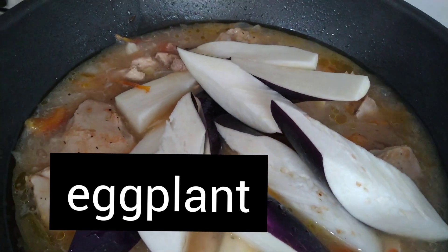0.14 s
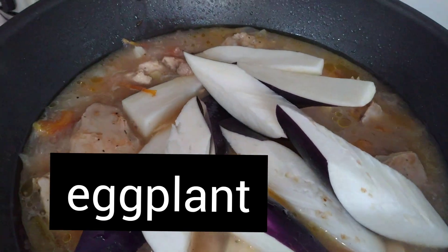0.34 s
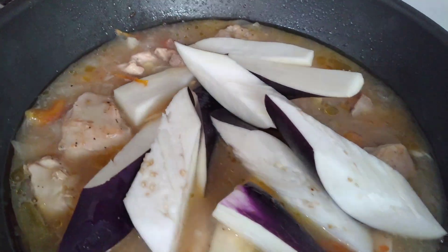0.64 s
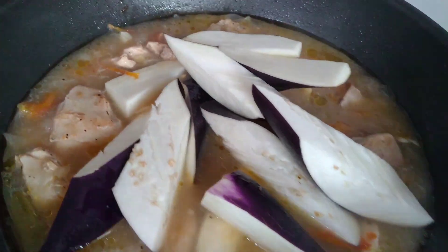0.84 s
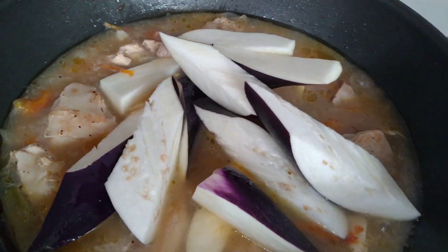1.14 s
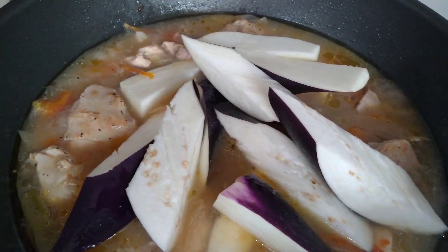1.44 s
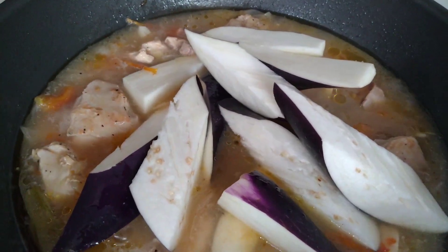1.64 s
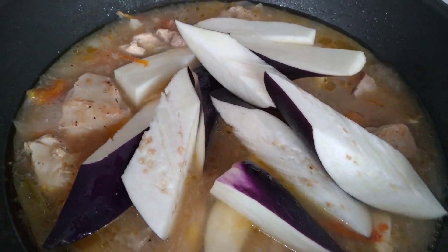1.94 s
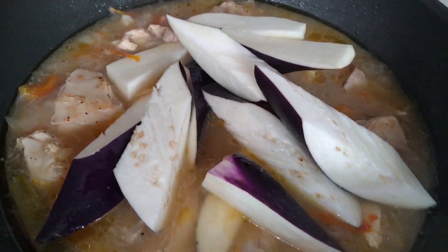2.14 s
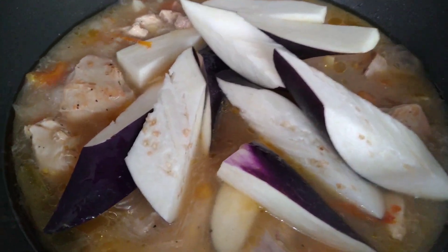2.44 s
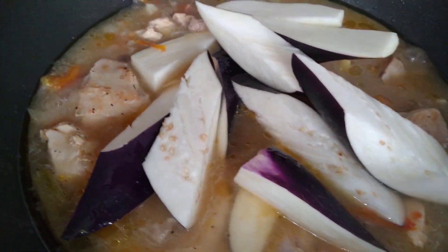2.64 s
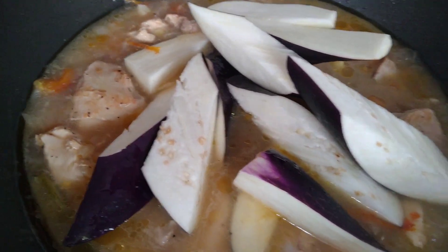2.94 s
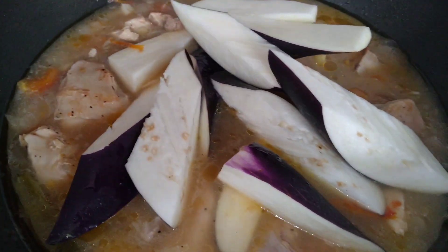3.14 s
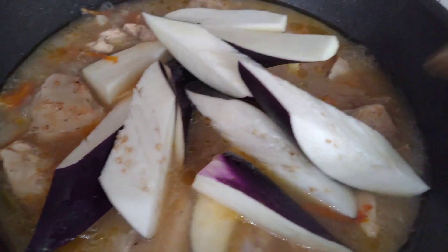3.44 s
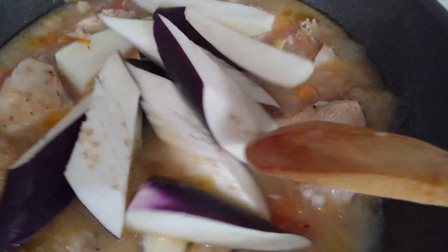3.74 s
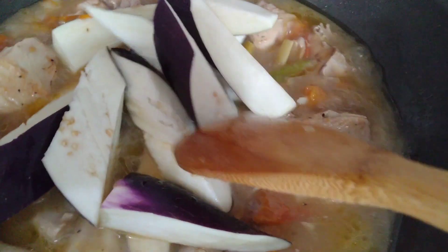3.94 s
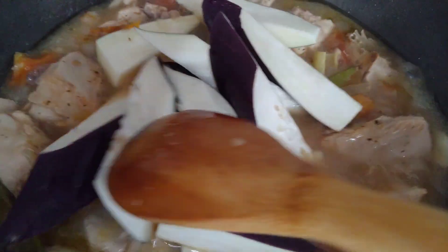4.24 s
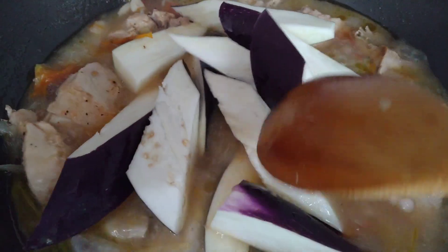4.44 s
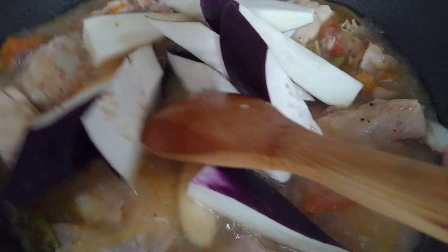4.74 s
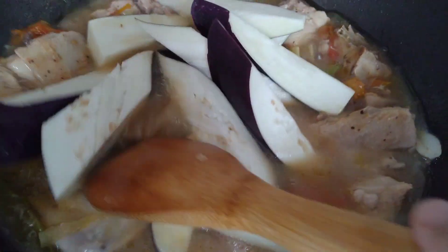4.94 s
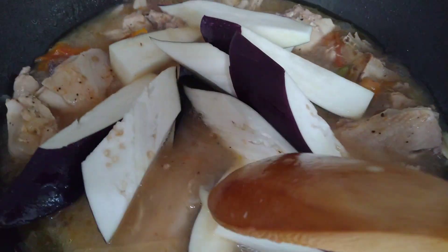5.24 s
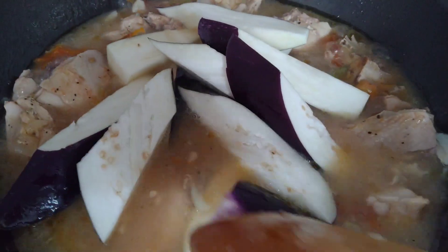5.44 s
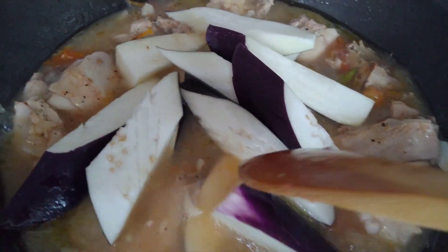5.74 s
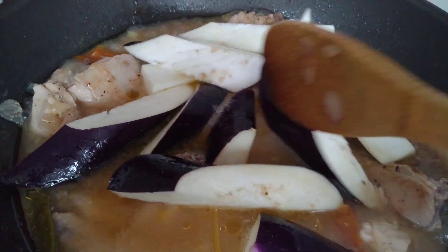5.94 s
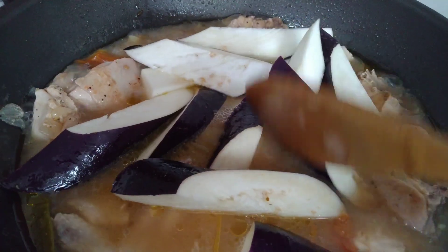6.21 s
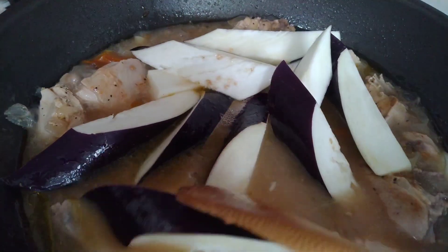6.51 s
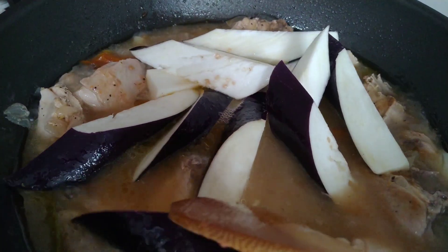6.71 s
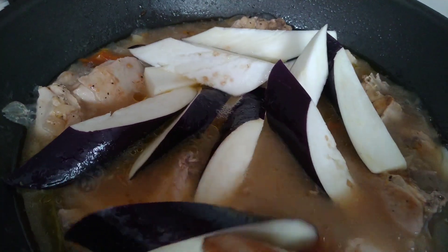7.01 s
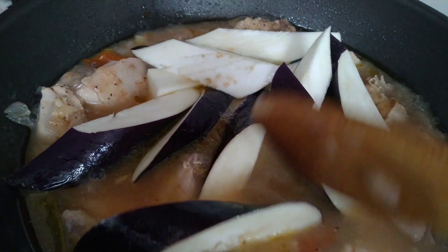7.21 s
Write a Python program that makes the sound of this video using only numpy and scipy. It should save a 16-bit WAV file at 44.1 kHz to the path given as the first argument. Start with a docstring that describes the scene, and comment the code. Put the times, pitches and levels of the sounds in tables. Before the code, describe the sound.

A simmering pan plops and seethes, a dish clacks nearby, and vegetables are pushed through sloshing broth while the stove hums.

```python
"""Soup simmers in a pan, heard from just above: bubbles burst over a fine seething, the pan rings faintly.
The stove hums and throbs as close tones beat. In the small kitchen a dish clacks down, wood knocks and a
utensil clinks, each ringing in its modes. Then a wooden spatula pushes vegetable slices through the broth,
which sloshes, squelches and spits on the hot wall; it scrapes the pan once. The sound drops out briefly."""
import sys
import numpy as np
from scipy import signal
from scipy.fft import rfft, irfft
from scipy.io import wavfile

SR = 44100
rng = np.random.default_rng(int(sys.argv[2]) if len(sys.argv) > 2 else 0)


def materialize(psi):
    """Save the field psi as 16-bit PCM at rate SR to the path in sys.argv[1].

    A 1-D psi becomes a single channel; in a 2-D psi each row is a channel.
    """
    bounded = np.clip(np.atleast_2d(psi).T, -1, 1)
    quanta = np.round(bounded * 32767).astype(np.int16)
    wavfile.write(sys.argv[1], SR, quanta)


N = 325017
TIME = np.arange(N) / SR

# spectrum of splashing broth: f/Hz, level/dB
SQUELCH_COLOUR = [(150, -4.5), (450, -6.5), (850, -4.5), (1700, 5), (3200, -3), (4300, -12.5),
                  (8000, -17.5), (12000, -23)]
# spectrum of droplets on hot metal: f/Hz, level/dB
SPIT_COLOUR = [(1000, -29), (3000, -2), (5000, -19), (8000, 0), (11000, -8.5), (14500, 4.5), (16000, -6)]


def amp(db):
    return 10 ** (np.asarray(db) / 20)


def unit(x):
    return x / np.sqrt(np.mean(x ** 2) + 1e-20)


def at_hz(points, hz):
    """Table value, interpolated over log frequency."""
    f, value = np.transpose(points)
    return np.interp(np.log(hz + 1), np.log(f + 1), value)


def follow(points):
    """Table value, interpolated over time."""
    return np.interp(TIME, *np.transpose(points))


def add(mix, start_s, sound):
    part = mix[max(round(start_s * SR), 0):][:len(sound)]
    part += sound[:len(part)]


def swell(peak_s, rise_s, fall_s):
    """Gaussian rise to 1, exponential fall."""
    t = TIME - peak_s
    return np.exp(-(np.minimum(t, 0) / rise_s) ** 2 - np.maximum(t, 0) / fall_s)


def stirred(start_s=3.5, ramp_s=0.094):
    """0 before stirring, ramping to 1."""
    return np.clip((TIME - start_s) / ramp_s, 0, 1)


def click(colour, size=4096):
    """Minimum-phase click of unit energy with the given spectrum."""
    hz = abs(np.fft.fftfreq(size, 1 / SR))
    log_gain = np.log(amp(np.maximum(at_hz(colour, hz), -90)))
    spectrum = np.exp(np.conj(signal.hilbert(log_gain)))
    pulse = np.fft.ifft(spectrum).real[:size // 2]
    return pulse / np.linalg.norm(pulse)


def coloured(x, colour):
    return signal.oaconvolve(x, click(colour))[:N]


def narrow_noise(hz, width_hz):
    """Noise in one resonance; at 0 Hz, a random drift."""
    f = np.fft.rfftfreq(N, 1 / SR)
    return unit(irfft(rfft(rng.standard_normal(N)) / (1 + ((f - hz) / width_hz) ** 2), N))


def impulses(per_s, spread_db):
    """Randomly timed impulses of random size and sign."""
    size = amp(spread_db * np.minimum(rng.exponential(1, N), 4)) * rng.choice([-1, 1], N)
    return size * (rng.random(N) < per_s / SR)


def room(x, size=30000):
    """Kitchen reverberation: dense reflections, each band decaying at its own rate."""
    # reverberation time: f/Hz, t60/s
    decay = [(150, 0.79), (500, 0.54), (1200, 0.42), (3000, 0.44), (7000, 0.35), (15000, 0.51)]
    reflections = rng.choice([-1., 1.], size) * (rng.random(size) < 0.2)
    hz, t, bands = signal.stft(reflections, SR, nperseg=256)
    bands = bands * amp(-60 * t / at_hz(decay, hz)[:, None])
    tail = signal.istft(bands, SR, nperseg=256)[1]
    tail *= 1 - np.exp(-np.arange(len(tail)) / SR / 0.00067)
    return signal.fftconvolve(x, tail / np.linalg.norm(tail))[:len(x)]


def bubble(hz, cycles, size=1500):
    """A burst bubble's cavity: swells within a cycle, rings down, rises slightly in pitch."""
    turns = hz * np.arange(size) / SR
    envelope = (1 - np.exp(-(turns / 0.5) ** 2)) * np.exp(-turns / cycles)
    wave = envelope * np.sin(2 * np.pi * (turns + 0.053 * turns ** 2 / (turns + 3)))
    return wave / abs(wave).max()


def fizz(low_hz, high_hz, per_s, spread_db, cycles):
    """Bubble swarm, random in time, pitch and size."""
    out = np.zeros(N)
    for when, pitch, rarity in rng.random((int(per_s * N / SR), 3)):
        hz = low_hz * (high_hz / low_hz) ** pitch
        size_db = spread_db * min(-np.log(1 - rarity), 3)
        add(out, when * N / SR, amp(size_db) * unit(bubble(hz, cycles)))
    return unit(out)


def plopping(splash_db=-26, splash_decay_s=0.013):
    """Large bubbles burst and their film splashes back; lesser plops fall between."""
    # large bubbles: t/s, peak/dB, f/Hz, decay/cycles
    bursts = [(0.195, -35, 1170, 2.4), (0.314, -44.5, 930, 1.2), (0.411, -44, 820, 1.3),
              (0.621, -34.5, 1130, 1.2), (0.699, -34.5, 1380, 1.1), (0.731, -44, 1000, 2),
              (0.79, -42, 1390, 2.5), (0.906, -41.5, 1250, 5), (0.973, -43, 940, 1.8),
              (0.985, -43, 1140, 1.4), (1.133, -40, 800, 1.8), (1.272, -40, 920, 1.1),
              (1.284, -32, 1000, 1.5), (1.389, -35.5, 865, 2.8), (1.611, -36.5, 1170, 1.4),
              (2.549, -32, 690, 0.78), (2.713, -36, 890, 0.43), (3.167, -34, 1270, 2.4),
              (3.268, -41.5, 784, 1.2), (3.321, -38, 1200, 3.9), (3.405, -38.5, 1250, 1.6),
              (3.542, -30.5, 1300, 3.5), (3.847, -43, 3100, 1.5), (4.265, -38, 690, 0.47),
              (4.496, -40, 1520, 2.9), (4.709, -43, 1690, 2), (4.728, -38.5, 1380, 1.7),
              (4.769, -40.5, 630, 1.1), (4.772, -38, 1670, 1.1), (5.101, -42, 3250, 4),
              (5.317, -41, 1400, 2.5), (5.34, -43, 1720, 3.3), (5.548, -38.5, 1380, 3.6),
              (5.629, -38, 1180, 1.8), (5.721, -41.5, 2250, 2.3), (5.899, -41.5, 1760, 2.2),
              (6.211, -39.5, 1760, 8.4), (6.313, -34, 1370, 3.1)]
    plops, splash_envelope = np.zeros(N), np.zeros(N)
    fall = np.exp(-TIME[:3000] / splash_decay_s)
    for start_s, db, hz, cycles in bursts:
        add(plops, start_s, amp(db) * bubble(hz, cycles))
        add(splash_envelope, start_s, amp(db + splash_db) * fall)
    splashes = splash_envelope * coloured(rng.standard_normal(N), SQUELCH_COLOUR)
    lesser = amp(-74) * fizz(650, 1180, per_s=4, spread_db=0, cycles=1.3)
    return plops + splashes + lesser


def seething():
    """A bed of small bubbles and fine crackle; the pan rings faintly along."""
    # crackle spectrum: f/Hz, level/dB
    seethe_colour = [(60, -42), (300, -2.5), (600, 0.5), (1200, -3), (2000, -5), (3400, -8.5),
                     (4100, -16.5), (6800, -18.5), (7650, -13), (7950, -14), (8200, -12), (9500, -20.5),
                     (12000, -22), (15000, -17)]
    # seething strength: t/s, gain/dB
    heat = [(0, -2), (1.7, -1), (2.6, 0), (4.5, 0.5), (5.7, 0.5), (7.37, -2)]
    # pan resonances: f/Hz, level/dB
    pan_modes = [(339, -70.5), (1346, -86), (1855, -76), (2164, -80.5), (2767, -81)]
    bubbles = amp(-67.5) * fizz(503, 2040, per_s=80, spread_db=3.2, cycles=3.6)
    crackle = amp(-61.5) * unit(coloured(impulses(per_s=7000, spread_db=2), seethe_colour))
    pan = sum(amp(db) * narrow_noise(hz, width_hz=7.8) for hz, db in pan_modes)
    return amp(follow(heat)) * (bubbles + crackle) + pan


def stove(hum_hz=104.42, throb_hz=1.74, flutter_hz=6.93, throb_crest_s=3.415, flutter_crest_s=3.46):
    """A hum beats with two weaker tones just below it, over a low rush; hum and throb swell once."""
    # rush spectrum: f/Hz, level/dB
    rush_colour = [(30, -46.5), (55, -21), (80, -9), (110, 4), (135, 1), (185, -3), (250, -10), (310, -6),
                   (450, -14), (800, -18.5), (2000, -51.5)]
    middle_s, spread_s = 3.5, 1.7
    surge = np.exp(-abs((TIME - middle_s) / spread_s) ** 3)
    turns = hum_hz * TIME + 0.011 * narrow_noise(0, width_hz=2.8)
    roughness = 0.069 * narrow_noise(hum_hz, width_hz=11)
    hum = amp(-52 + 1.2 * surge) * (np.sin(2 * np.pi * turns) + roughness)
    throb = amp(-54.5) * surge * np.sin(2 * np.pi * (turns - throb_hz * (TIME - throb_crest_s)))
    flutter = amp(-65.5) * np.sin(2 * np.pi * (turns - flutter_hz * (TIME - flutter_crest_s)))
    rush = amp(-55) * unit(coloured(rng.standard_normal(N), rush_colour))
    return np.sqrt(2) * (hum + throb + flutter) + rush


def strikes(blows, colour, modes, ring_db, crack_db, echo_s, echo_gain, size=33000):
    """Each blow: a thud with counter echo and reverberation, a bright crack, the object's modes."""
    # contact spectrum: f/Hz, level/dB
    crack_colour = [(500, -16.5), (3000, -3), (5000, -15), (8500, -2), (11500, -16), (16000, -16)]
    crack_decay_s = 0.0093
    t, thud, out = np.arange(size) / SR, np.zeros(size), np.zeros(N)
    ring = sum(amp(db - 60 * t / t60_s) * np.sin(2 * np.pi * (hz * t + rng.random()))
               for hz, db, t60_s in modes)
    ring *= amp(ring_db) / np.linalg.norm(ring)
    add(thud, 0, click(colour))
    add(thud, echo_s, echo_gain * click(colour))
    thud /= np.linalg.norm(thud)
    for start_s, db, room_db in blows:
        crack = coloured(rng.standard_normal(size), crack_colour)[:size] * np.exp(-t / crack_decay_s)
        crack *= amp(crack_db) / np.linalg.norm(crack)
        add(out, start_s, amp(db) * (thud + crack + ring + amp(room_db) * room(thud)))
    return out


def dish_clack():
    """A dish lands on its foot and rocks back once."""
    # contacts: t/s, level/dB, room gain/dB
    blows = [(1.7654, 1, 8.5), (1.767, -3.5, 9), (1.8195, -1.5, 4.5)]
    # impact spectrum: f/Hz, level/dB
    colour = [(120, -64), (250, -24), (400, -10.5), (600, -6), (1040, 2), (1550, -4), (2000, -1), (2300, 2),
              (2700, -10), (4000, -15), (5400, -26.5), (8100, -17), (9000, -32.5), (15500, -43)]
    # dish modes: f/Hz, level/dB, t60/s
    modes = [(377.4, -6, 0.29), (767, -10.5, 0.35), (975, 2.5, 0.49), (965, -16.5, 0.98),
             (1073, -4.5, 0.27), (1153, -12.5, .3), (1253, -16, 0.18), (1520, -29, 0.18), (2103, -6, 0.22),
             (2220, -2.5, .33), (2225, -11, .48), (2265, 0, 0.33), (2380, -23, 0.67), (7100, -27, .2),
             (8050, -11, 0.39)]
    return strikes(blows, colour, modes, ring_db=2, crack_db=-18, echo_s=0.001347, echo_gain=0.23)


def wood_knock():
    """One duller blow on wood."""
    # contact: t/s, level/dB, room gain/dB
    blows = [(2.077, -3.5, 6)]
    # impact spectrum: f/Hz, level/dB
    colour = [(50, -62), (150, -8), (280, -11), (400, 0.5), (550, -2.5), (675, 0.5), (1060, 4),
              (1650, -12.5), (3000, -12), (4000, -28), (8000, -29.5), (16000, -43)]
    # wood modes: f/Hz, level/dB, t60/s
    modes = [(430, -8, 0.55), (665, 4, 0.34), (715, -5.5, .25), (790, -1, 0.47), (936, -13, 0.57),
             (1030, -9, 0.29), (1220, -8, 0.18), (3210, -6, 0.16), (3100, -2.5, 0.12)]
    return strikes(blows, colour, modes, ring_db=4, crack_db=-9, echo_s=0.00142, echo_gain=0.17)


def utensil_clinks():
    """Light taps excite a utensil's high, short-lived modes."""
    # contacts: t/s, level/dB, room gain/dB
    blows = [(2.5315, -28, 8.5), (2.572, -35, -6), (2.624, -24.5, 3)]
    # impact spectrum: f/Hz, level/dB
    colour = [(300, -39), (800, 13), (2800, 9), (4200, -0.5), (6500, 1.5), (10500, -7), (15000, -31)]
    # utensil modes: f/Hz, level/dB, t60/s
    modes = [(2790, 6, 0.056), (5250, 0, 0.045), (6420, 3, 0.051), (6650, -8, .12), (7860, -7, .12),
             (9200, -12, .1), (12700, -8, .07)]
    return strikes(blows, colour, modes, ring_db=2.5, crack_db=-5, echo_s=0.003, echo_gain=0.42)


def sloshing():
    """Large air pockets gurgle low in the broth behind the spatula."""
    # slosh envelope: t/s, level/dB
    slosh = [(3.1, -90), (3.3, -71), (3.8, -63.5), (4.2, -60.5), (4.6, -64), (4.75, -60.5), (5.2, -66.5),
             (5.7, -59), (6, -79), (7.37, -83)]
    return amp(follow(slosh)) * fizz(227, 555, per_s=160, spread_db=2.5, cycles=2)


def stirring(lapping_db=-72.5):
    """Each spatula push squeezes out bubbles and washes broth up the hot wall, where it sizzles."""
    # pushes: peak t/s, decay/s, squelch level/dB, relative sizzle level/dB
    pushes = [(3.25, .12, -63, -69), (3.42, 0.054, -61, -68), (3.69, 0.11, -63, -73), (3.85, .05, -63, -73),
              (3.97, 0.062, -59, -67.5), (4.28, 0.033, -60.5, -66), (4.5, 0.096, -64, -77),
              (4.75, .08, -60, -74), (5.09, 0.056, -57, -64), (5.33, .08, -63, -68),
              (5.46, .08, -64.5, -74), (5.64, 0.19, -56, -71), (6.07, 0.22, -58.5, -70),
              (6.2, 0.089, -53.5, -69), (6.32, 0.16, -60, -62), (6.6, .16, -56, -64),
              (6.88, 0.14, -67, -65), (7.128, 0.039, -56, -75), (7.31, 0.089, -59, -68.5)]
    squelch_gain, sizzle_gain = amp(lapping_db) * stirred(), np.zeros(N)
    for peak_s, decay_s, squelch_db, sizzle_db in pushes:
        push = swell(peak_s, rise_s=0.044, fall_s=decay_s)
        squelch_gain = np.hypot(squelch_gain, amp(squelch_db) * push)
        sizzle_gain = np.hypot(sizzle_gain, amp(sizzle_db) * push)
    gulps = amp(7.9 * np.tanh(narrow_noise(0, width_hz=30)))
    squelch = unit(gulps * coloured(impulses(per_s=2500, spread_db=1.5), SQUELCH_COLOUR))
    pops = fizz(450, 3000, per_s=160, spread_db=2.4, cycles=2.4)
    pips = fizz(8500, 15300, per_s=110, spread_db=4, cycles=4)
    flicker = amp(8.1 * np.tanh(narrow_noise(0, width_hz=70)))
    hiss = unit(coloured(flicker * impulses(per_s=6800, spread_db=-1), SPIT_COLOUR))
    sizzle = amp(-3.5) * unit(0.55 * pips + hiss)
    return squelch_gain * unit(squelch + 0.68 * pops) + sizzle_gain * sizzle


def spitting(large_decay_s=0.0072, small_decay_s=0.0041):
    """Droplets flash to steam on the hot wall; small ones start once stirring wets it."""
    # large droplets: t/s, peak/dB
    droplets = [(3.918, -52), (4.052, -55), (4.764, -56), (5.059, -33.5), (5.632, -55), (5.907, -59),
                (6.305, -51), (6.346, -55), (6.861, -56)]
    t, large = TIME[:800], np.zeros(N)
    for start_s, db in droplets:
        steam = np.exp(-t / large_decay_s) * rng.standard_normal(len(t))
        burst = signal.fftconvolve(steam, click(SPIT_COLOUR))
        add(large, start_s, amp(db) * burst / abs(burst).max())
    flashes = signal.oaconvolve(impulses(per_s=14, spread_db=2.5), np.exp(-t / small_decay_s))[:N]
    small = unit(coloured(flashes * rng.standard_normal(N), SPIT_COLOUR))
    return large + amp(-74.5) * stirred() * small


def scraping():
    """The wooden spatula slips over the pan in tiny jerks, for one stroke."""
    # scrape spectrum: f/Hz, level/dB
    colour = [(300, -19), (700, 4.5), (2000, 1), (4000, -11), (5100, -12), (5550, -4), (6100, -15),
              (8500, -9), (10500, -17), (15000, -13)]
    stroke = amp(-48) * swell(peak_s=4.425, rise_s=0.019, fall_s=0.034)
    return stroke * unit(coloured(impulses(per_s=2200, spread_db=2.5), colour))


def scene():
    """Mono mix: the pan close, with little reverberation; the kitchenware further off."""
    soup = plopping() + seething() + stirring() + sloshing() + spitting() + scraping()
    return (soup + amp(-9) * room(soup) + stove() + dish_clack() + wood_knock() + utensil_clinks())[None]


def record(dry):
    """The sound cuts out briefly and fades back in; then a low-pass."""
    # dropout: stop t/s, restart t/s, full level t/s
    dropout = (5.756, 5.812, 5.905)
    stop_s, restart_s, full_s = dropout
    fade_in = np.clip((TIME - restart_s) / (full_s - restart_s), 0, 1)
    gate = np.where(TIME < stop_s, 1, fade_in)
    cutoff_hz = 15900
    lowpass = signal.firwin(511, cutoff_hz, window=("kaiser", 9), fs=SR)
    return signal.oaconvolve(dry * gate, lowpass[None], "same")


dry = scene()
out = record(dry)
materialize(out)
```